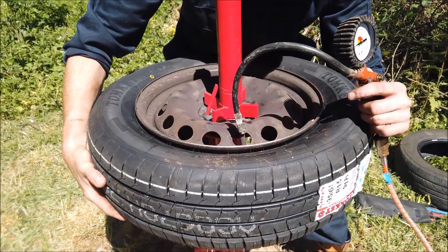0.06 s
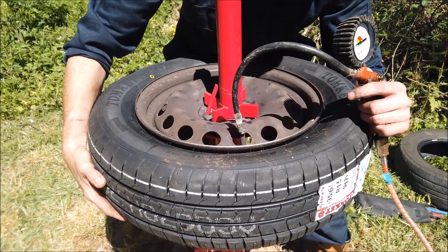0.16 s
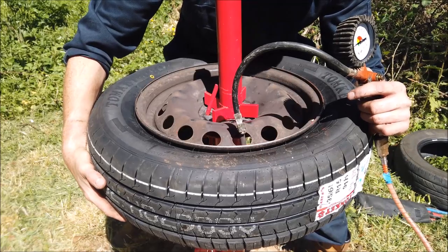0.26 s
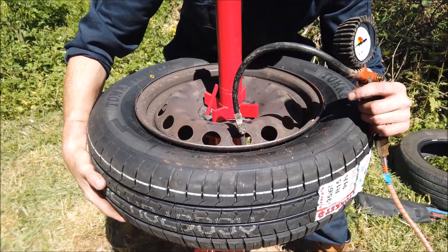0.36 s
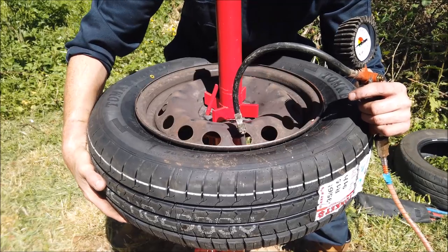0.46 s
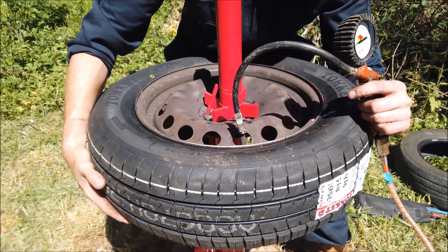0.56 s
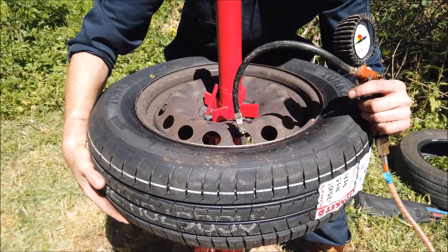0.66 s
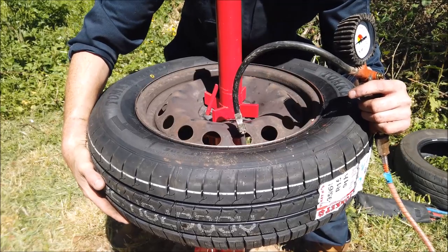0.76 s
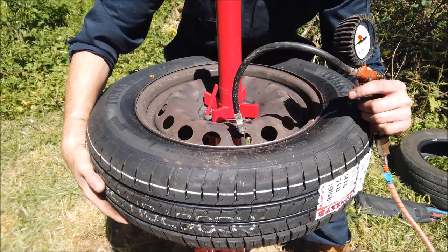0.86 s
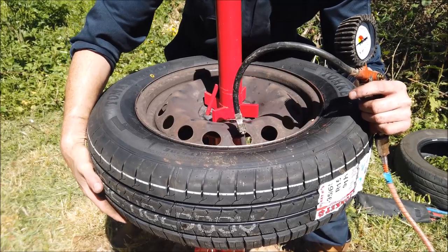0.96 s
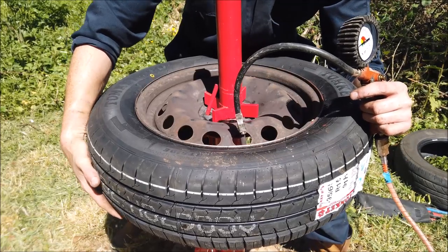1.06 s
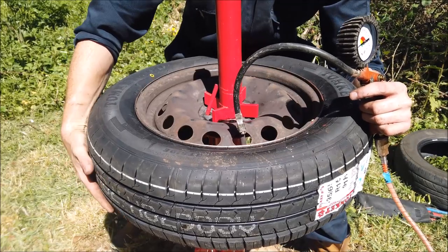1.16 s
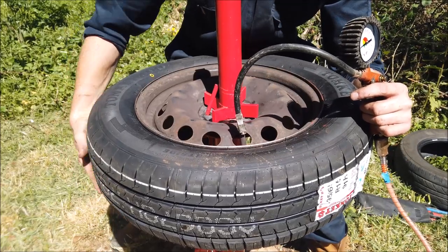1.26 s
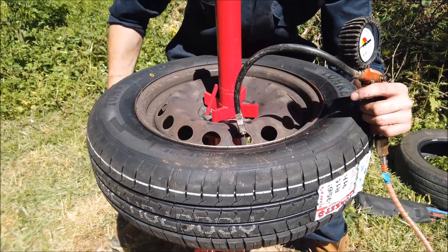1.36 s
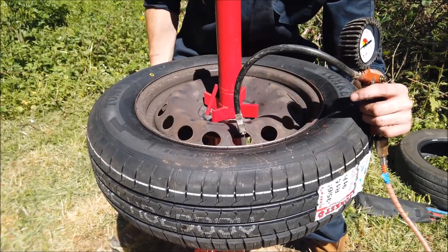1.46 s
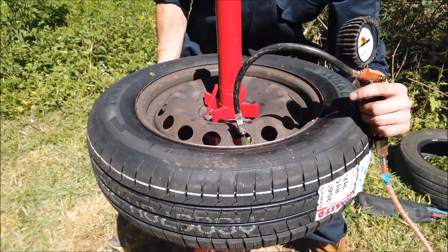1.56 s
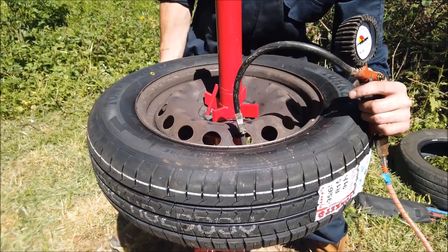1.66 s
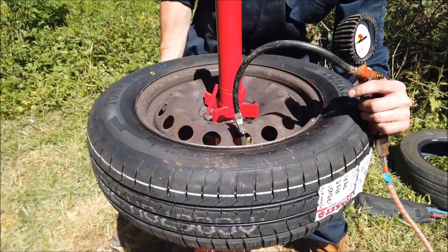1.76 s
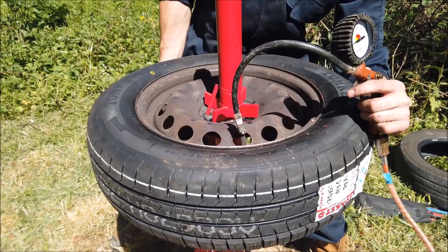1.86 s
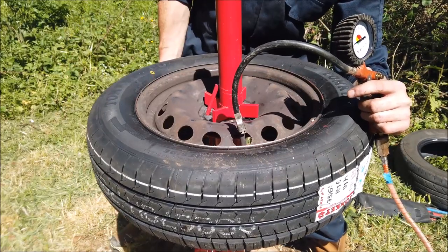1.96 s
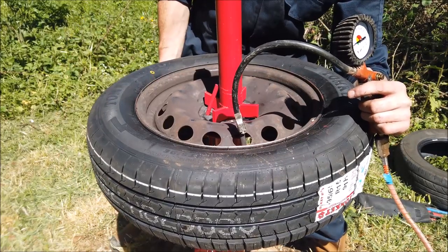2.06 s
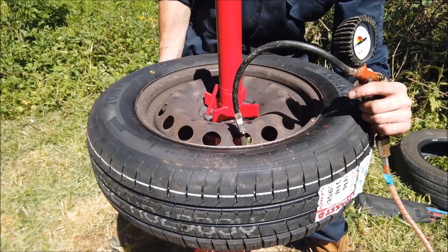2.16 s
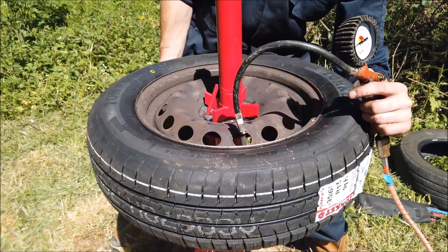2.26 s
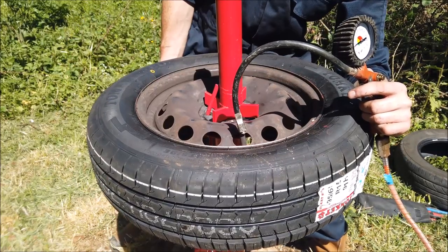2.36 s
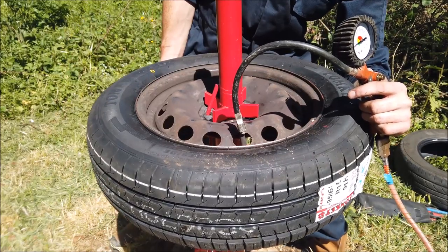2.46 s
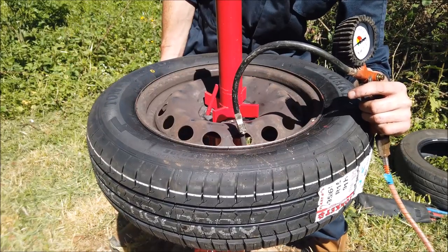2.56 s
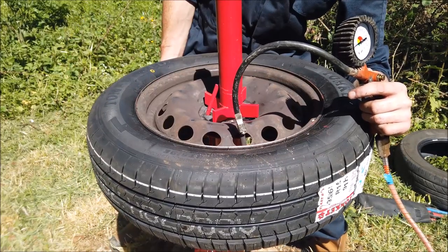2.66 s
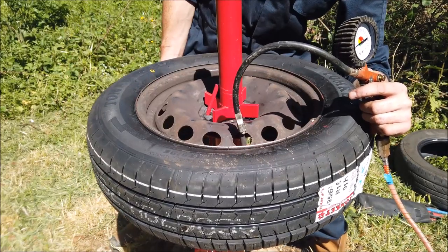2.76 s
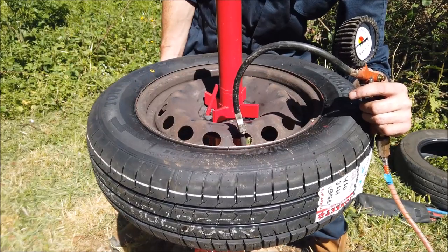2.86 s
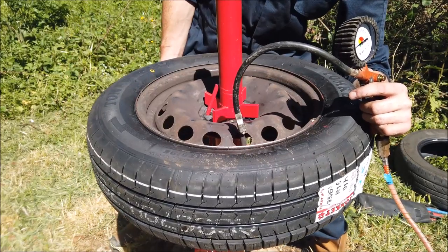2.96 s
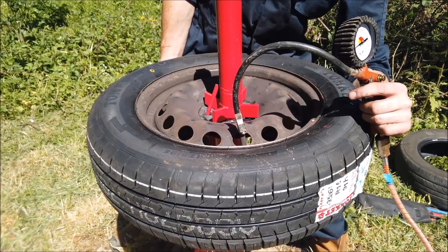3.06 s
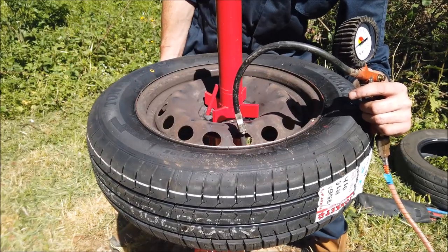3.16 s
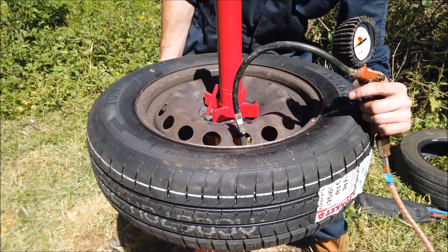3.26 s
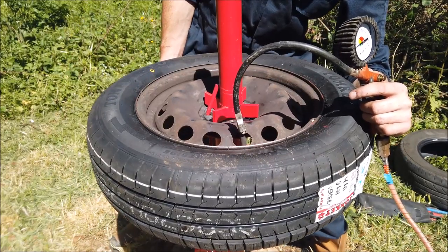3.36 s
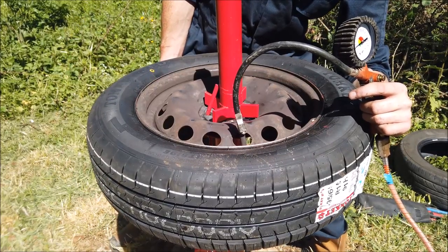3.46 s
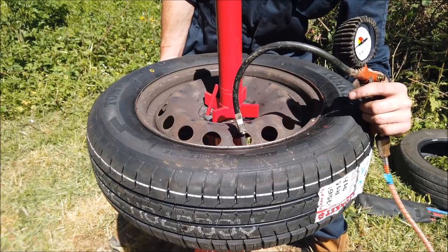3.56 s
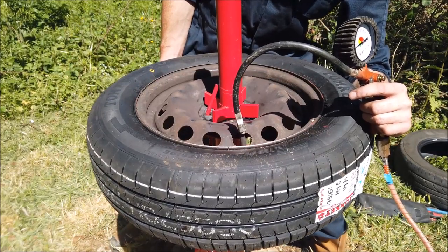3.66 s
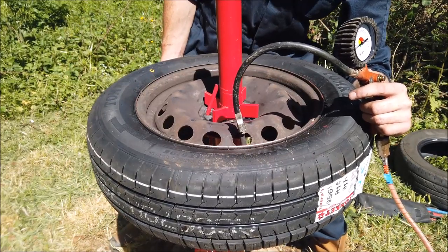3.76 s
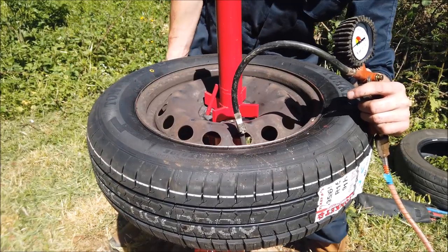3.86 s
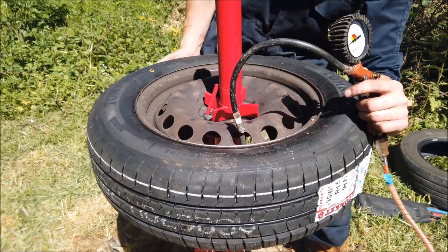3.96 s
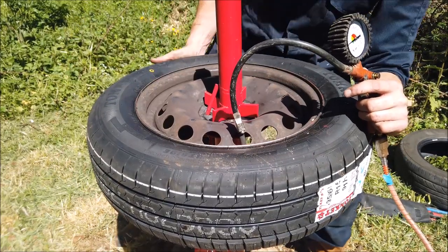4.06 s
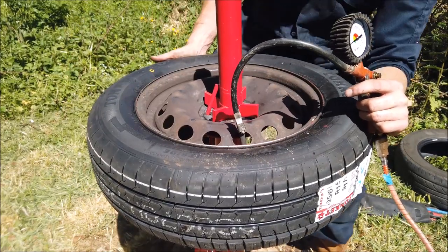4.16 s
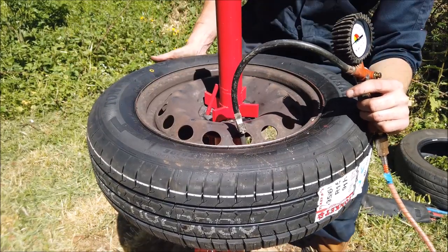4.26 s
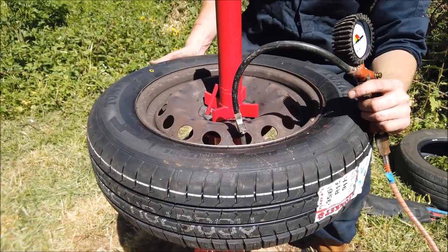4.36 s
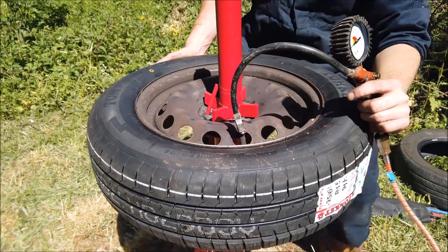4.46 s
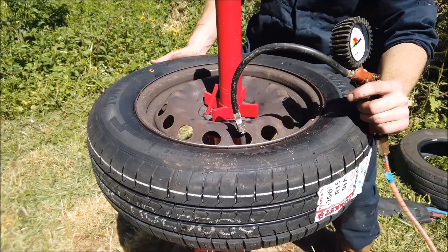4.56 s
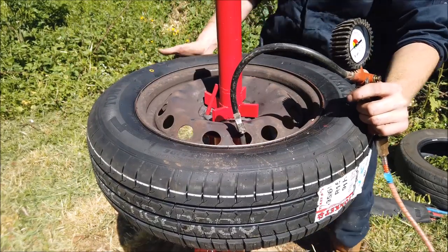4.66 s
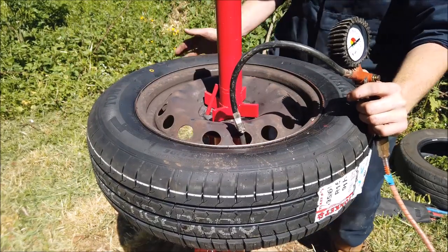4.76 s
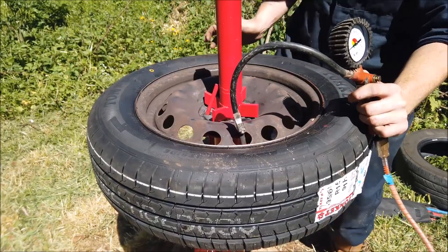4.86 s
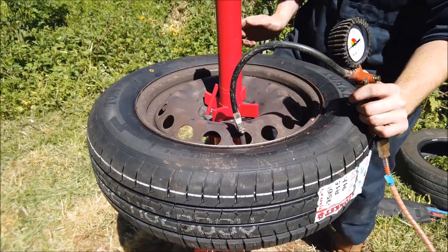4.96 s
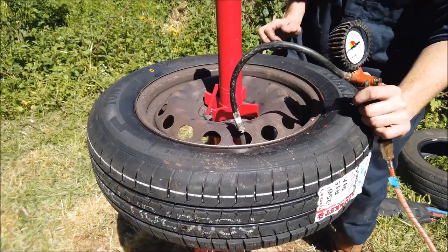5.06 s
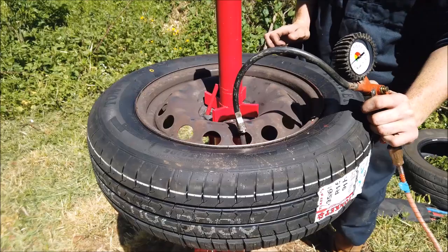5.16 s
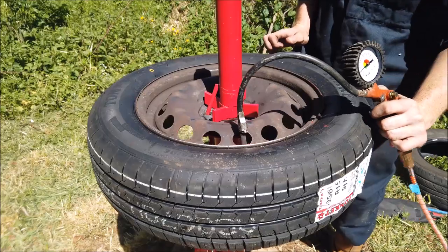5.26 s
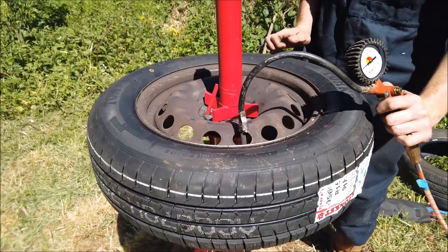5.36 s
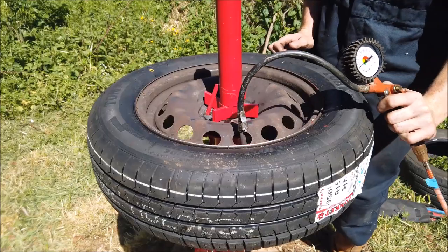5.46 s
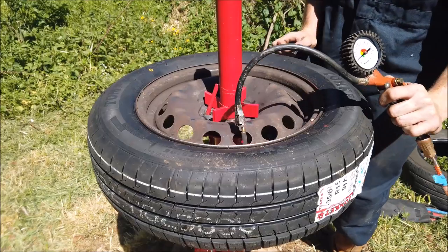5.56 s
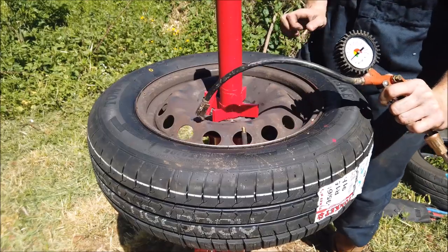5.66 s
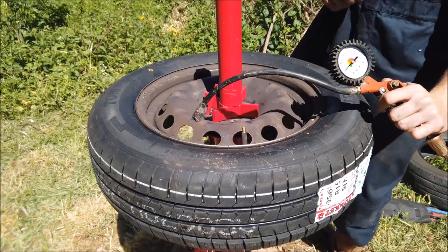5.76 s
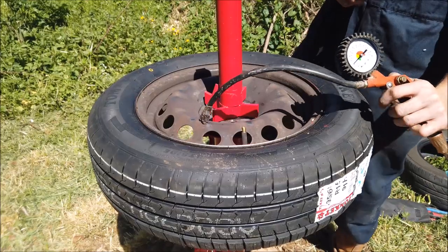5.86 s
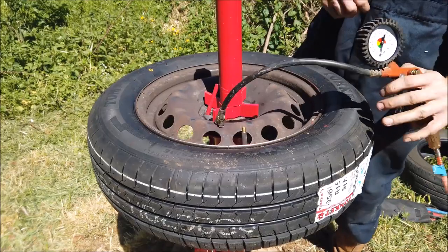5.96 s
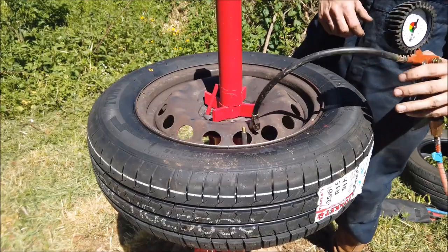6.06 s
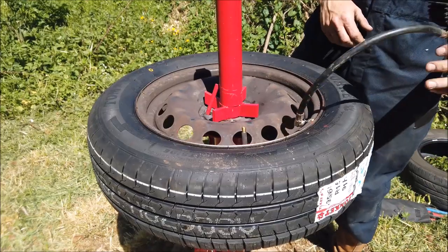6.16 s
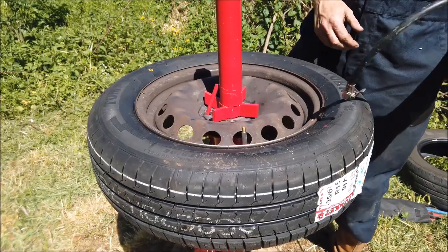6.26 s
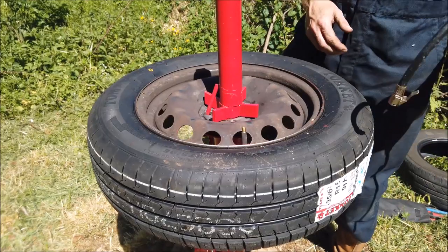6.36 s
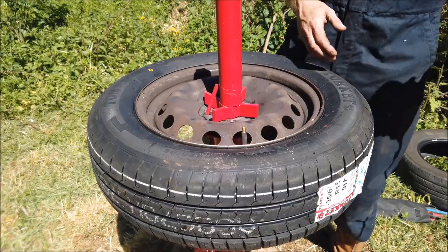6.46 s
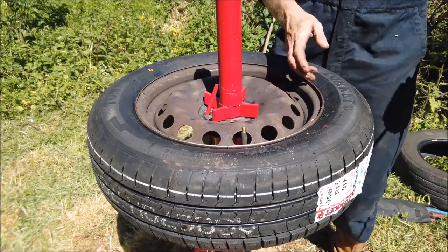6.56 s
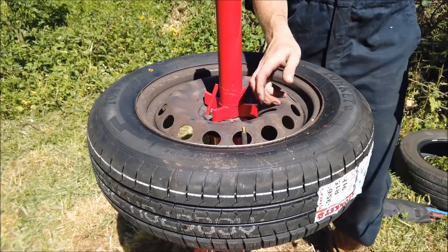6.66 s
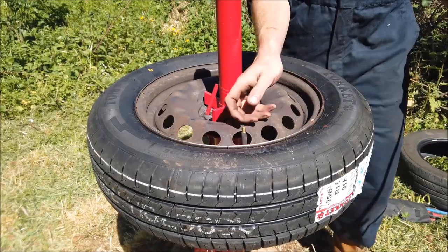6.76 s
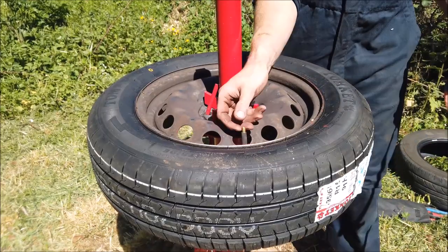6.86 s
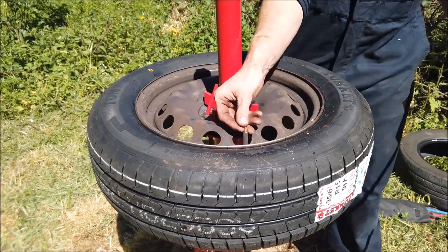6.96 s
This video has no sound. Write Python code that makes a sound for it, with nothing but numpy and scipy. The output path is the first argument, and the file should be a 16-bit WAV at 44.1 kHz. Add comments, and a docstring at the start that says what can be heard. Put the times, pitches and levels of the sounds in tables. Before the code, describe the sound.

Compressed air hisses brightly past a tyre bead outdoors, a small pop early on, then a violent overloaded bang and a rougher spurting rush of escaping air.

```python
"""In a meadow, a car tyre is inflated on a stand. Turbulent air hisses past the loose bead, with a dull rush below it.
The lower bead seats with a small pop, the upper with a bang that overloads the microphone: impulses ring the tyre.
The chuck is knocked off, with thuds and ticks as damped swings, and puffs while air spurts from the open valve.
Reflections off rim, rubber and hands comb the treble of the hiss. A sleeve swishes over the rubber as
swelling bands of noise, and a breeze rumbles on the microphone as low noise rising in gusts."""
import sys
import numpy as np
from scipy import signal
from scipy.fft import rfft, irfft, next_fast_len
from scipy.io import wavfile
from scipy.ndimage import uniform_filter1d, map_coordinates

SR = 44100
rng = np.random.default_rng(int(sys.argv[2]) if len(sys.argv) > 2 else 0)


def unload_wav(signal):
    """Save mono or channel-first audio to the path in sys.argv[1] as 16-bit WAV at rate SR, clipped to [-1, 1]."""
    wavfile.write(
        sys.argv[1],
        SR,
        np.round(np.clip(np.atleast_2d(signal).T, -1, 1) * 32767).astype(np.int16),
    )


N = 308788

# air past the bead: t/s, thin jet level/dB, broad flow level/dB, finest hiss level/dB
LEAK_LEVELS = [(0.0, -19.5, -32.5, -23), (0.44, -21, -33, -18), (0.68, -25.5, -35, -18.5),
               (0.8, -23.5, -31.5, -20.5), (1.06, -23.5, -33, -19.5), (1.25, -30, -34.5, -17.5),
               (1.55, -26.5, -34, -16.5), (1.74, -29.5, -39, -31), (1.84, -25.5, -35.5, -20.5),
               (2.23, -24.5, -34, -26.5), (2.5, -26, -36.5, -29.5), (2.64, -29.5, -38, -28.5),
               (3.31, -21.5, -34, -22), (3.82, -24, -36.5, -26), (4.1, -25.5, -33.5, -32),
               (4.28, -29, -40, -37), (4.45, -28.5, -40.5, -27.5), (4.86, -33, -39, -29.5),
               (5.28, -30.5, -37, -41.5), (5.69, -26.5, -32.5, -31), (5.712, -22.5, -25, -28)]
# air from the open valve: t/s, thin jet level/dB, broad flow level/dB, finest hiss level/dB
VALVE_LEVELS = [(5.76, -20, -23, -40), (5.82, -20, -34, -24), (5.9, -23.5, -30, -20),
                (6.079, -18.5, -24.5, -28), (6.093, -24, -24, -32), (6.191, -23, -17.5, -24),
                (6.25, -18.5, -25, -42), (6.639, -20, -24, -22.5), (6.895, -23, -21.5, -20.5),
                (6.92, -22, -15, -25), (6.965, -31, -18.5, -24), (7.0, -30, -16.5, -30)]
# relative spectra of the leak's thin jet and broad flow, then of the valve's: f/Hz, level/dB per Hz
LEAK_JET_SPECTRUM = [(5000, -10), (6900, -5), (8000, -1), (9000, 2), (11000, 4.5), (13000, 3.5),
                     (15700, -1.5)]
LEAK_FLOW_SPECTRUM = [(1100, -31), (1300, -9), (1700, 1.5), (2800, 1.5), (5000, -0.5), (7000, -1.5),
                      (10000, -46.5)]
VALVE_JET_SPECTRUM = [(5000, -2), (7000, -1), (9000, 4.5), (11000, 3.5), (13000, 2.5), (15700, -1)]
VALVE_FLOW_SPECTRUM = [(1100, -4.5), (1700, 6), (2800, 7.5), (5000, 3), (7000, 6), (10000, 2.5)]
# short reflected paths off rim, rubber and hands, each lasting until the worker's next pose:
# pose begins t/s, extra delay at first/us, extra delay at last/us, strength/1 (below 0 if inverted)
REFLECTED_PATHS = [(0, 129, 131, -0.27), (0, 195, 192, 0.33), (0, 303, 290, 0.35), (0, 368, 358, -0.22),
                   (0, 489, 482, 0.17), (0, 551, 562, -0.18), (0.3, 122, 134, -0.48), (0.3, 202, 223, 0.23),
                   (0.3, 297, 308, 0.16), (0.3, 360, 367, -0.38), (0.3, 416, 437, -0.28),
                   (0.3, 587, 583, -0.32), (0.6, 136, 125, -0.34), (0.6, 232, 223, 0.18),
                   (0.6, 293, 254, 0.25), (0.6, 363, 354, -0.23), (0.6, 581, 552, -0.16),
                   (0.6, 989, 960, -0.16), (0.6, 1090, 1061, -0.15), (0.85, 135, 131, -0.51),
                   (0.85, 216, 227, 0.28), (0.85, 261, 274, 0.51), (0.85, 342, 340, -0.16),
                   (0.85, 604, 597, 0.22), (0.85, 968, 974, -0.15), (1.15, 129, 134, -0.48),
                   (1.15, 256, 244, 0.4), (1.15, 265, 310, 0.21), (1.15, 391, 363, -0.2),
                   (1.15, 475, 445, -0.14), (1.15, 987, 932, -0.16), (1.45, 106, 118, 0.52),
                   (1.45, 124, 124, -0.69), (1.45, 276, 298, 0.29), (1.45, 469, 443, -0.15),
                   (1.45, 716, 735, -0.13), (1.45, 936, 988, -0.14), (1.65, 127, 96, -0.15),
                   (1.65, 422, 486, -0.17), (1.65, 625, 573, 0.18), (1.65, 812, 855, 0.14),
                   (1.65, 1214, 1152, 0.13), (1.85, 148, 152, 0.54), (1.85, 152, 160, -0.65),
                   (1.85, 440, 470, 0.44), (1.85, 452, 476, -0.49), (1.85, 766, 778, -0.16),
                   (1.85, 849, 799, 0.16), (1.85, 1260, 1245, 0.15), (2.4, 127, 94, 0.15),
                   (2.4, 464, 407, -0.13), (2.4, 521, 514, -0.17), (2.4, 631, 656, -0.15),
                   (2.4, 757, 743, -0.21), (2.9, 96, 101, 0.28), (2.9, 216, 210, 0.15),
                   (2.9, 339, 349, -0.16), (2.9, 499, 505, -0.14), (2.9, 642, 625, 0.55),
                   (2.9, 644, 629, -0.69), (2.9, 729, 742, -0.19), (2.9, 776, 794, -0.13),
                   (2.9, 894, 908, -0.15), (3.5, 104, 104, 0.25), (3.5, 214, 217, 0.16),
                   (3.5, 347, 349, -0.19), (3.5, 481, 474, 0.27), (3.5, 498, 481, -0.3),
                   (3.5, 643, 643, -0.18), (3.5, 744, 735, -0.22), (3.5, 793, 778, -0.18),
                   (3.5, 911, 886, -0.13), (4.05, 125, 114, 0.27), (4.05, 251, 245, -0.12),
                   (4.05, 369, 359, -0.23), (4.05, 495, 455, -0.23), (4.05, 564, 558, -0.18),
                   (4.25, 182, 163, -0.26), (4.25, 456, 444, -0.16), (4.25, 642, 652, -0.26),
                   (4.25, 782, 768, -0.24), (4.25, 803, 841, 0.12), (4.25, 876, 893, -0.13),
                   (4.45, 170, 144, -0.19), (4.45, 217, 220, 0.2), (4.45, 306, 265, -0.18),
                   (4.45, 330, 369, 0.2), (4.45, 600, 577, 0.17), (4.45, 892, 935, -0.13),
                   (4.65, 251, 317, -0.17), (4.65, 301, 353, -0.24), (4.65, 415, 406, -0.2),
                   (4.65, 464, 564, -0.21), (4.65, 580, 521, -0.14), (4.9, 257, 224, 0.15),
                   (4.9, 334, 335, -0.27), (4.9, 489, 425, 0.15), (5.15, 131, 143, 0.11),
                   (5.15, 244, 252, 0.25), (5.15, 326, 338, -0.4), (5.15, 405, 416, 0.15),
                   (5.15, 471, 455, 0.25), (5.15, 555, 520, 0.13), (5.15, 666, 677, 0.28),
                   (5.72, 94, 95, 0.18), (5.72, 419, 343, -0.12), (5.72, 702, 869, -0.14),
                   (5.72, 868, 802, -0.12), (6.1, 196, 202, 0.15), (6.1, 332, 329, -0.19),
                   (6.1, 480, 429, -0.15), (6.1, 588, 554, -0.14), (6.1, 780, 739, -0.14),
                   (6.5, 157, 147, -0.13), (6.5, 186, 217, 0.19), (6.5, 230, 278, 0.14),
                   (6.5, 340, 346, -0.16)]
# narrow gliding bands where paths cancel, and some where the hiss is stronger: # begins t/s, ends t/s, first
# f/Hz, last f/Hz, loss level/dB (below 0 a gain)
GLIDING_BANDS = [(0, .6, 1850, 1860, 6), (.65, 1.45, 1980, 2100, 3), (0, .75, 5150, 5450, 6),
                 (.2, .85, 13850, 13800, 5), (.2, .8, 11600, 11500, 6), (.25, .85, 12200, 12800, -4.5),
                 (.5, 1.25, 9100, 9100, 6), (.45, 1.15, 7150, 7100, 5), (.65, 1.05, 11750, 12200, -3),
                 (.85, 1.4, 6150, 6050, 7), (1.0, 2.3, 3400, 3320, -3), (1.2, 1.65, 11900, 11750, -6),
                 (1.8, 1.95, 4150, 4300, 8), (1.85, 2.7, 1900, 1980, 5), (1.8, 2.65, 11500, 11900, 5),
                 (1.8, 3.0, 7700, 7800, 4), (3.05, 4.05, 2830, 2800, 5), (3.1, 4.0, 3600, 3700, 5),
                 (4.05, 4.25, 7900, 9100, 6), (4.3, 4.65, 8500, 8030, -5), (4.4, 5.101, 7300, 6800, 5),
                 (4.6, 4.85, 4000, 3500, -4), (4.85, 5.7, 2600, 2850, 5), (5.1, 5.7, 3250, 3300, -4),
                 (5.78, 6.1, 2740, 2480, 8), (5.85, 6.08, 9000, 9400, -5), (6.25, 6.8, 2780, 2800, 6)]
# how much the worker moves about: t/s, activity/1 (0 still, 1 busy)
ACTIVITY = [(0, .2), (1.0, .2), (1.3, .8), (1.8, 1), (1.95, .1), (2.35, .1), (2.5, .5), (2.8, .12),
            (4.0, .12), (4.15, 1), (5.05, 1), (5.25, .2), (5.7, .2), (6.05, .3), (6.2, .55), (7.0, .55)]
# dull rush of the inflow: t/s, level/dB
RUSH_LEVELS = [(0.0, -43.5), (0.28, -38), (0.58, -42), (0.75, -39), (2.5, -43.5), (3.9, -45), (4.7, -42.5),
               (5.7, -45.5), (6.37, -47), (6.88, -41)]
# relative spectrum of the rush: f/Hz, level/dB per Hz
RUSH_SPECTRUM = [(71, -7), (120, -27), (327, -0.5), (849, -1), (1040, -1.5), (1270, 3), (1450, -1),
                 (1750, -5), (2500, -18), (3250, -78), (5500, -120)]
# air ring in the tyre and dish of the wheel, blown by the inflow: f/Hz, T60/s, level at first/dB, faded by t/s
AIR_HOLLOWS = [(242, 0.17, -48.5, 3.04), (1300, 0.045, -42, 1.74)]
# gusts on the microphone: peak t/s, level/dB, 10 dB rise/s, 10 dB fall/s
GUST_SWELLS = [(.29, -39.5, .1, 0.3), (.69, -31, 0.029, 0.16), (1.41, -35.5, 0.31, 0.16),
               (1.66, -32, 0.22, 0.17), (2.17, -41, .07, 0.12), (2.61, -37.5, 0.099, 0.038),
               (3.07, -42, 0.22, 0.068), (3.51, -45, 0.5, 0.041), (4.08, -35.5, 0.14, 0.41),
               (4.73, -30, 0.12, 0.44), (5.35, -32, 0.045, 0.03), (5.73, -36.5, 0.25, 0.31),
               (6.38, -39, 0.046, 0.44), (6.84, -31, 0.11, 0.13)]
# relative spectrum of the breeze: f/Hz, level/dB per Hz
BREEZE_SPECTRUM = [(8.8, -36), (15, 2), (34, -0.5), (151, -17.5), (189, -19.5), (300, -28.5), (390, -27),
                   (660, -120)]
# beads snapping onto the rim: t/s, level/dB, contact time constant/ms, first swing/1 (+1 push, -1 pull)
BEAD_SNAPS = [(.681, -16.7, 0.17, -1), (5.699, 5.7, .2, 1), (5.7009, 12.2, 0.11, -1),
              (5.7028, 6.1, 0.066, 1)]
# modes of the inflated tyre and rim: f/Hz, level/dB, T60/s
TYRE_MODES = [(72, -8, 0.054), (163, 9, 0.027), (221, -15, 0.16), (283, -10, 0.01), (382, 9.5, 0.021),
              (500, -6.5, 0.067), (567, 0.5, 0.033), (676, -2, 0.027), (1050, -5, 0.045), (1184, -4, 0.035),
              (1350, 0.5, 0.023), (1760, -13, 0.049), (3260, 3, 0.007)]
# soft thuds and ticks: t/s, level/dB, f/Hz, cycles to fall 60 dB/1, first swing/1
THUDS_AND_TICKS = [(.6826, -12, 245, 16, 1), (.686, -24, 105, 8, -1), (4.7448, -10.5, 98, 2.7, -1),
                   (5.342, -18.5, 110, 4.9, -1), (5.7395, -14, 4500, 45, 1), (5.7415, -16, 1950, 22, 1),
                   (6.3303, -11, 1150, 10, -1), (6.3393, -18, 1350, 14, 1), (6.789, -10.5, 130, 1.9, 1),
                   (6.812, -21, 150, 2.5, -1), (6.848, -14, 55, 3, 1), (6.932, -22, 260, 3, 1)]
# sleeve strokes on the rubber: peak t/s, level/dB, 10 dB rise/s, 10 dB fall/s
SLEEVE_STROKES = [(1.65, -43.5, 0.077, 0.039), (4.16, -38, 0.24, 0.33), (6.919, -36, 0.031, 0.063),
                  (6.98, -44, 0.014, .04)]
# bands of the sleeve noise, the higher mostly confined to the height of the stroke:
# f/Hz, relative level/dB, share of the stroke's rise and fall/1
SLEEVE_BANDS = [(224, -6.5, 0.73), (413, -1, 0.62), (680, -0.5, 0.43), (1270, 2, 0.26), (2200, -26, 0.3)]
# hollow puffs of the freed chuck at the wheel: peak t/s, level/dB, 10 dB rise/s, 10 dB fall/s
CHUCK_PUFFS = [(5.788, -20, 0.013, .01), (5.815, -25, .006, 0.019), (5.872, -22, 0.056, 0.032),
               (6.05, -32, 0.32, 0.078), (6.17, -23, 0.14, .03), (6.2, -22.5, 0.032, 0.016),
               (6.23, -33, .03, 0.0097)]
# relative spectrum of the puffs: f/Hz, level/dB per Hz
CHUCK_SPECTRUM = [(180, -14.5), (300, -13), (424, -3.5), (573, -1), (825, -8), (1160, 3), (1620, -3.5),
                  (2500, -19), (3250, -37), (5500, -120)]

FINEST_HZ = 12300   # the jet's finest hiss lies above this
VALVE_OPENS_S, VALVE_OPENING_S = 5.733, .008   # start and duration of opening
BLAST_DB, BLAST_T60_S = 14, 0.058   # first spurt, relative to the steady outflow it joins
PATH_FADE_S, PATH_WANDER_US, WANDERS_PER_S = .15, 4, 2.5   # spread and rate of wander when fully busy
FAR_PATH_STRENGTH, FAR_PATH_WANDER_US = .13, 90   # paths off arms, legs and stand; strength when fully busy
BAND_WIDTH_HZ, BAND_FADE_S = 160, .1   # width of a gliding band at half its depth in dB
CALM_DB = -49   # breeze between gusts
SEAT_TAIL_DB, SEAT_TAIL_T60_S, SEAT_TAIL_HZ = -19, 0.15, 710   # rough rattle of stand and rim
SWISH_LOW_HZ, SWISH_HIGH_HZ, SWISH_WIDTH_HZ = 250, 960, 40   # hollow note in the sleeve's swish
CUTOFF_HZ = 15780   # treble limit of the microphone signal


def from_db(db):
    """Level definition: amplitude gain is ten to the power of dB over twenty."""
    return 10 ** (np.asarray(db) / 20)


def rms_one(x):
    """Normalisation: a signal divided by its root mean square has unit rms."""
    return x / np.sqrt(np.mean(x ** 2) + 1e-20)


def in_time(rows):
    """Linear interpolation: each column after the time gives one value per sample."""
    s, *columns = np.transpose(rows)
    return [np.interp(np.arange(N) / SR, s, c) for c in columns]


def drift(rate_hz):
    """Low-pass random process: noise through a double pole wanders slowly with unit rms."""
    # computed at every 40th sample
    r = np.exp(-80 * np.pi * rate_hz / SR)
    noise = rng.standard_normal(N // 40 + 2002)
    slow = signal.lfilter([1], [1, -2 * r, r * r], noise)[2000:]
    return np.interp(np.arange(N) / 40, np.arange(len(slow)), rms_one(slow))


def swells(rows):
    """Exponential growth and decay: levels rise and fall linearly in dB about each peak, and powers add."""
    t = np.arange(N) / SR
    power = 0
    for s, db, rise, fall in rows:
        tens_of_db = np.where(t < s, (s - t) / rise, (t - s) / fall)
        power = power + from_db(db - 10 * tens_of_db) ** 2
    return np.sqrt(power)


def coloured(spectrum):
    """Spectral shaping: white noise is weighted in frequency, then scaled to unit rms."""
    hz, db = np.transpose(spectrum)
    size = next_fast_len(N)
    log_hz = np.log(np.maximum(np.arange(size // 2 + 1) * SR / size, 1))
    beyond = np.maximum(np.log(hz[0]) - log_hz, 0) + np.maximum(log_hz - np.log(hz[-1]), 0)
    # outside the table the spectrum falls by a further 7.8 dB per octave
    shape = from_db(np.interp(log_hz, np.log(hz), db) - 11.2 * beyond)
    return rms_one(irfft(rfft(rng.standard_normal(size)) * shape, size)[:N])


def ring(excitation, hz, t60):
    """Damped resonance: a unit impulse starts a decaying sine of initial amplitude 1."""
    r, w = from_db(-60 / (t60 * SR)), 2 * np.pi * hz / SR
    return signal.lfilter([0, np.sin(w)], [1, -2 * r * np.cos(w), r * r], excitation + 1e-18)


def click(s, size):
    """Impulse excitation: all the energy lies in one sample."""
    out = np.zeros(N)
    out[round(s * SR)] = size
    return out


def jet(levels, thin_spectrum, broad_spectrum, flutter_db):
    """Turbulent jet noise: a thin bright jet, its finest part fluttering separately, lies over a broad flow."""
    thin_db, broad_db, finest_db = in_time(levels)
    bright = coloured(thin_spectrum)
    low_pass = signal.butter(2, FINEST_HZ, "low", fs=SR, output="sos")
    high_pass = signal.butter(2, FINEST_HZ, "high", fs=SR, output="sos")
    thin = rms_one(signal.sosfiltfilt(low_pass, bright))
    finest = rms_one(signal.sosfiltfilt(high_pass, bright))
    out = from_db(thin_db + flutter_db * drift(9.8)) * thin
    out += from_db(finest_db + flutter_db * drift(15)) * finest
    return out + from_db(broad_db + flutter_db * drift(3.5)) * coloured(broad_spectrum)


def restless(spread_us):
    """Path-length modulation: a random delay changes faster the more the worker moves."""
    steps = np.cumsum(in_time(ACTIVITY)[0])
    return spread_us * np.interp(steps, np.arange(N), drift(WANDERS_PER_S))


def delayed(oversampled, at):
    """Propagation delay: the signal, sampled four times as finely, is read at fractional sample positions."""
    return map_coordinates(oversampled, [4 * at], order=1)


def reflected(x):
    """Comb filtering: gliding early reflections interfere with direct sound, normalised by their power sum."""
    out, power, t = x.copy(), np.ones(N), np.arange(N) / SR
    wander_us = in_time(ACTIVITY)[0] ** 2 * restless(PATH_WANDER_US)
    poses = sorted({row[0] for row in REFLECTED_PATHS}) + [N / SR]
    oversampled = signal.resample_poly(x, 4, 1)
    for start, first_us, last_us, strength in REFLECTED_PATHS:
        end = poses[poses.index(start) + 1]
        on = np.arange(*np.searchsorted(t, [start - PATH_FADE_S / 2, end + PATH_FADE_S / 2]))
        # neighbouring poses crossfade
        inside_s = np.minimum(t[on] - start, end - t[on])
        gain = strength * np.clip(inside_s / PATH_FADE_S + .5, 0, 1)
        delay_us = np.interp(t[on], [start, end], [first_us, last_us]) + wander_us[on]
        out[on] += gain * delayed(oversampled, on - delay_us * SR / 1e6)
        power[on] += gain ** 2
    return out / np.sqrt(power)


def scattered(x):
    """Multipath interference: weak, longer paths of wandering length make fine notches bend and glide."""
    out = x.copy()
    oversampled = signal.resample_poly(x, 4, 1)
    strength = FAR_PATH_STRENGTH * np.sqrt(in_time(ACTIVITY)[0])
    for delay_us in np.geomspace(550, 3400, 8):
        late = (delay_us + restless(FAR_PATH_WANDER_US)) * SR / 1e6
        out += strength * delayed(oversampled, np.arange(N) - late)
    return out


def banded(x):
    """Destructive interference and spectral shaping: gliding narrow bands are weakened where paths cancel, and
    some are strengthened."""
    hz, t, frames = signal.stft(x, SR, nperseg=1024, noverlap=768)
    loss_db = 0
    for start, end, first_hz, last_hz, depth_db in GLIDING_BANDS:
        since_start = t - start if start > 0 else 1   # a band beginning at 0 is already present
        on = np.clip(np.minimum(since_start, end - t) / BAND_FADE_S + .5, 0, 1)
        centre_hz = np.interp(t, [start, end], [first_hz, last_hz])
        away = (hz[:, None] - centre_hz) / BAND_WIDTH_HZ
        loss_db = loss_db + depth_db * on * 2. ** (-(2 * away) ** 2)
    return signal.istft(frames * from_db(-loss_db), SR, nperseg=1024, noverlap=768)[1][:N]


def hiss():
    """Turbulent efflux: the bead leak gives way to the opening valve, whose first spurt decays exponentially."""
    since = np.arange(N) / SR - VALVE_OPENS_S
    opened = np.clip(since / VALVE_OPENING_S, 0, 1)
    spurt = 1 + from_db(BLAST_DB - 60 * np.maximum(since - VALVE_OPENING_S, 0) / BLAST_T60_S)
    leak = (1 - opened) * jet(LEAK_LEVELS, LEAK_JET_SPECTRUM, LEAK_FLOW_SPECTRUM, flutter_db=0.62)
    valve = opened * spurt * jet(VALVE_LEVELS, VALVE_JET_SPECTRUM, VALVE_FLOW_SPECTRUM, flutter_db=2.0)
    return scattered(reflected(leak + valve))


def rush():
    """Flow-excited cavity resonance: hollows of tyre and wheel sing in noise, fading to a fifth."""
    level = from_db(in_time(RUSH_LEVELS)[0] + 1.0 * drift(37))
    singing = 0
    for hz, t60, db, faded_s in AIR_HOLLOWS:
        fading = np.interp(np.arange(N) / SR, [0, faded_s], [1, .2])
        tone = rms_one(ring(rng.standard_normal(N), hz, t60))
        singing = singing + from_db(db + 2.2 * drift(0.58)) * fading * tone
    return level * coloured(RUSH_SPECTRUM) + singing


def breeze():
    """Wind-induced pressure fluctuation: lumpy low noise swells in gusts above a calm floor."""
    level = np.hypot(from_db(CALM_DB), swells(GUST_SWELLS))
    lumps = from_db(2.1 * drift(31.0) + 1.3 * drift(2.7))
    return level * lumps * coloured(BREEZE_SPECTRUM)


def seats():
    """Modal excitation: each smoothed bead impulse rings all tyre modes, with a dull rattle dying behind it."""
    blows, dying = np.zeros(N), np.zeros(N)
    tail_r = from_db(-60 / (SEAT_TAIL_T60_S * SR))
    for s, db, contact_ms, swing in BEAD_SNAPS:
        r = np.exp(-1000 / (contact_ms * SR))
        impulse = click(s, swing * from_db(db))
        blows += signal.lfilter([(1 - r) ** 2], [1, -2 * r, r * r], impulse + 1e-18)
        dying += signal.lfilter([1], [1, -tail_r], click(s, from_db(db)) + 1e-18)
    low_pass = signal.butter(2, SEAT_TAIL_HZ, fs=SR)
    dull = rms_one(signal.lfilter(*low_pass, rng.standard_normal(N)))
    ringing = sum(from_db(db) * ring(blows, hz, t60) for hz, db, t60 in TYRE_MODES)
    return ringing + from_db(SEAT_TAIL_DB) * dying * dull


def knocks():
    """Impact of a damped oscillator: each thud or tick is one short decaying sine."""
    out = np.zeros(N)
    for s, db, hz, cycles, swing in THUDS_AND_TICKS:
        out += ring(click(s, swing * from_db(db)), hz, cycles / hz)
    return out


def brushes():
    """Friction noise: cloth on rubber brightens, and its hollow note rises, as the stroke speeds up."""
    out = 0
    for hz, band_db, share in SLEEVE_BANDS:
        octave = signal.butter(1, [hz / np.sqrt(2), hz * np.sqrt(2)], "band", fs=SR)
        band = rms_one(signal.lfilter(*octave, rng.standard_normal(N)))
        strokes = [(s, db + band_db, rise * share, fall * share) for s, db, rise, fall in SLEEVE_STROKES]
        out = out + band * swells(strokes)
    speed = swells([(s, 0, rise * .4, fall * .4) for s, db, rise, fall in SLEEVE_STROKES])
    speed = np.minimum(uniform_filter1d(speed, size=SR // 20), 1)
    phase = 2 * np.pi * np.cumsum(SWISH_LOW_HZ + (SWISH_HIGH_HZ - SWISH_LOW_HZ) * speed) / SR
    # two slow random amplitudes in quadrature make a narrow noise band about the gliding note
    note = drift(SWISH_WIDTH_HZ) * np.cos(phase) + drift(SWISH_WIDTH_HZ) * np.sin(phase)
    out = out + note * swells([(s, db, rise * 0.57, fall * 0.35) for s, db, rise, fall in SLEEVE_STROKES])
    return out * from_db(1.2 * drift(42))


def chuck():
    """Pulsed turbulent flow: hollow noise swells in rough puffs."""
    return swells(CHUCK_PUFFS) * from_db(1.8 * drift(36)) * coloured(CHUCK_SPECTRUM)


def scene():
    """Superposition: all pressures add at one microphone, which feeds both channels."""
    air = banded(hiss() + rush())
    mono = air + breeze() + seats() + knocks() + brushes() + chuck()
    return np.array([mono, mono])


def record(dry):
    """Gain control and overload: loud peaks duck the level, clipping limits it, and a low-pass cuts treble."""
    level_db = 20 * np.log10(np.abs(dry).max(axis=0) + 1e-6)
    fall = 420 * np.arange(N) / SR      # release, dB per s
    held_db = np.maximum.accumulate(level_db + fall) - fall
    r = np.exp(-1 / (.012 * SR))        # smoothing time constant, s
    duck_db = signal.lfilter([1 - r], [1, -r], np.maximum(held_db + 7.5, 0))
    loud = np.clip(dry * from_db(-.47 * duck_db), -.98, .98)
    return signal.sosfilt(signal.ellip(14, .3, 60, CUTOFF_HZ, fs=SR, output="sos"), loud)


dry = scene()
out = record(dry)
unload_wav(out)
```